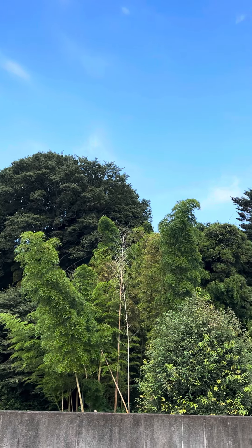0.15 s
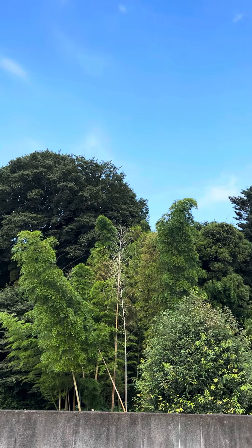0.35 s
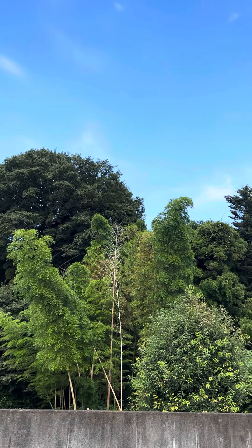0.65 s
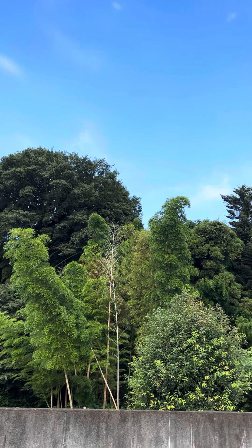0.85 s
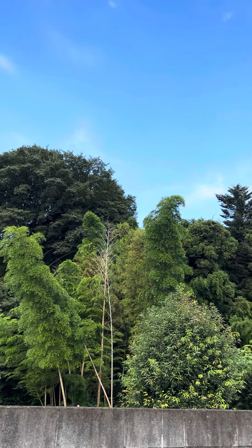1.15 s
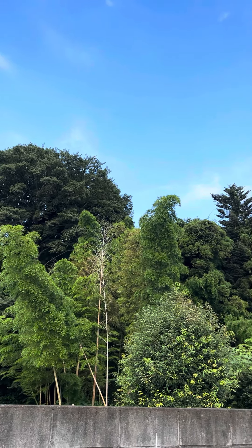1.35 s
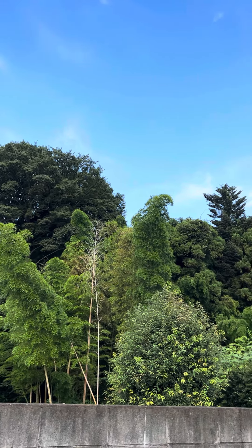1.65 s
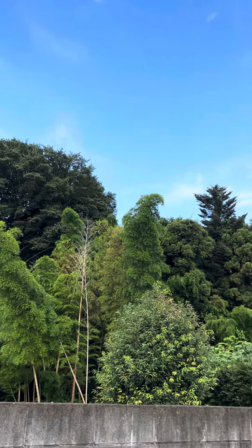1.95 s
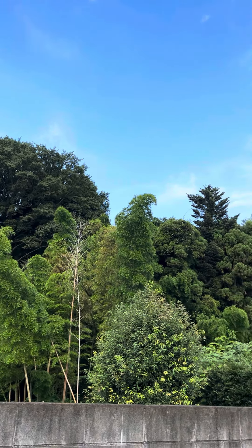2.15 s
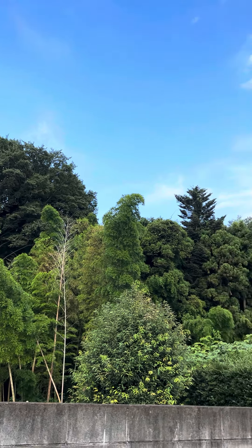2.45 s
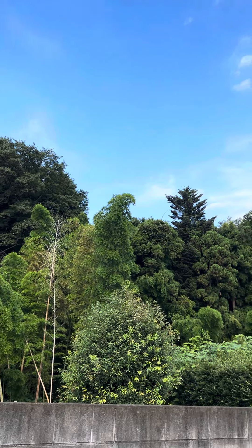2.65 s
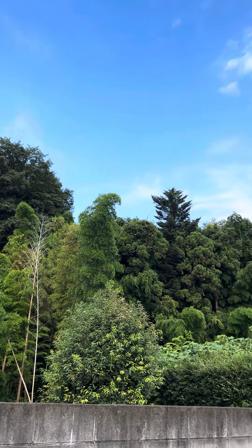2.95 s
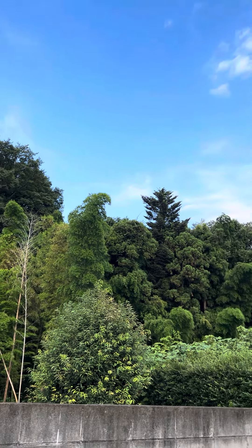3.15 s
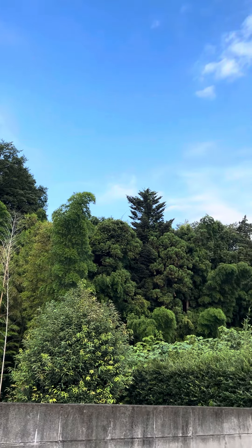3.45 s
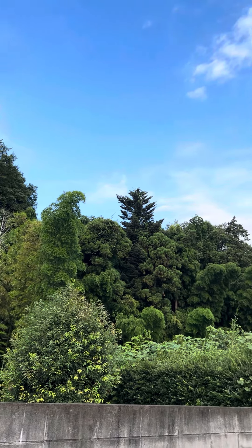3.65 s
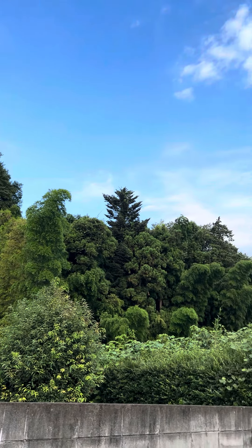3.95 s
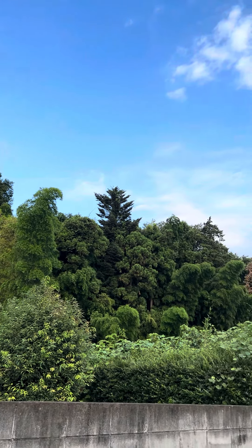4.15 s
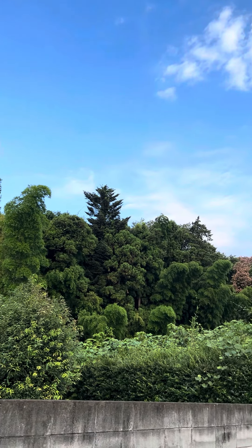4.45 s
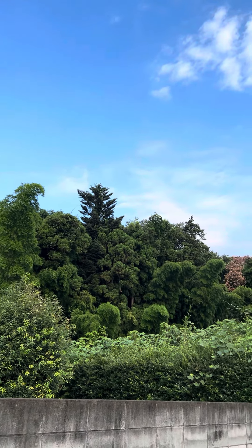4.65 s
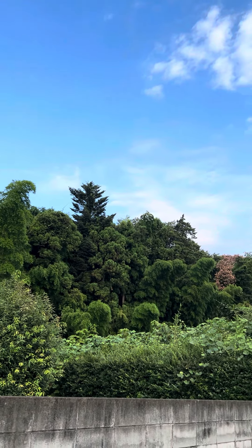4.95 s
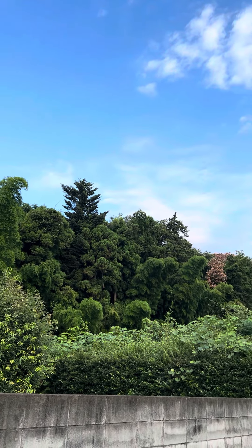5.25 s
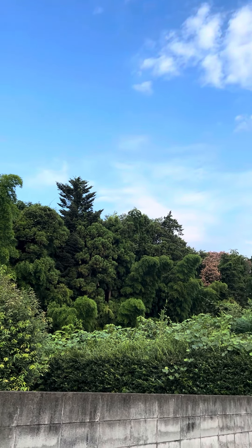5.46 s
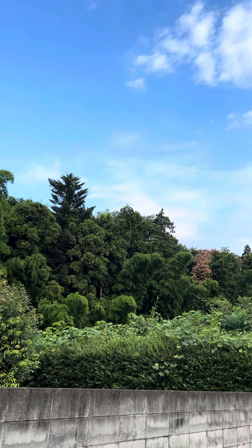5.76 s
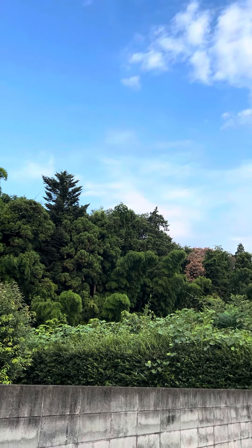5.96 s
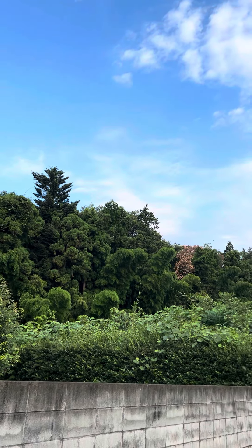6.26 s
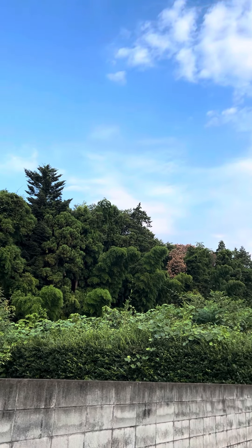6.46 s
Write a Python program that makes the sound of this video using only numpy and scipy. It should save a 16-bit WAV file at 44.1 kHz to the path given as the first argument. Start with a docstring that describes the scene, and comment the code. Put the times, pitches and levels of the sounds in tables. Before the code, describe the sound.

A steady high cicada sizzle fills a summer wood, then a bush warbler swells one long whistle into a quick bright flourish that echoes.

```python
"""Bush warbler at the edge of a summer wood

A bush warbler sings once: three soft notes, a long swelling whistle, then a quick flourish, all of them
nearly pure tones with a gliding pitch. Delayed copies make echoes off a wall, and decaying noise spreads
the song among the trees. Shaped noise makes a cicada chorus, and pulsing resonances or combs of tones make
the cicadas that stand out of it, over a low far rumble. Two close microphones pick it all up.
"""
import sys
import numpy as np
from scipy import signal
from scipy.fft import rfft, irfft, next_fast_len
from scipy.io import wavfile
from scipy.ndimage import uniform_filter1d

SR = 44100
rng = np.random.default_rng(int(sys.argv[2]) if len(sys.argv) > 2 else 0)


def unload_wav(signal):
    """Save mono or channel-first audio to the path in sys.argv[1] as 16-bit WAV at rate SR, clipped to [-1, 1]."""
    wavfile.write(
        sys.argv[1],
        SR,
        np.round(np.clip(np.atleast_2d(signal).T, -1, 1) * 32767).astype(np.int16),
    )


N = 291060
T = np.arange(N) / SR  # time of every sample in seconds
HZ = np.maximum(np.fft.rfftfreq(N, 1 / SR), 1)  # frequency of every spectrum bin
SIDES = np.array([[1], [-1]])  # left and right microphone


# The short notes: three soft ones lead in, the rest are the flourish.
# Each row: start in seconds, time to the turn in seconds, length in seconds, first pitch in Hz,
# turning pitch in Hz, last pitch in Hz, level at the turn in dB.
SHORT_NOTES = [ (3.727, .055, .135, 1520, 1352, 1357, -66.5), (3.956, .075, .15, 1523, 1375, 1345, -70),
               (4.10, .06, .15, 1385, 1340, 1394, -68.5), (5, 0.032, 0.075, 1220, 1461, 1438, -42.5),
               (5.127, 0.0238, 0.043, 1470, 1862, 1560, -37), (5.23, 0.0193, 0.032, 4010, 2732, 2985, -30),
               (5.261, 0.021, .056, 3200, 1922, 2370, -33.5), (5.392, .009, 0.011, 3330, 4980, 4930, -44.5),
               (5.402, 0.012, 0.026, 4950, 3530, 3640, -32), (5.428, .025, 0.046, 4300, 2424, 2513, -28.5),
               (5.526, 0.0291, .066, 1723, 2311, 1210, -32.5)]


def warbler():
    """The song arrives directly, by a few distinct echoes and through the wood."""
    sung = whistle() + sum(note(*row) for row in SHORT_NOTES)
    song, direct = sung[0], sung[1:]
    scattered = wood(song, build_s=0.011, near_db=14, near_t60_s=0.13)
    return direct + catch() + echoes(song) + scattered


WHISTLE_START_S, WHISTLE_CREST_S, WHISTLE_END_S = 4.205, 4.78, 5.012
WHISTLE_FIRST_DB, SWELL_DB_PER_S, SLACKEN_DB_PER_S = -67.5, 21, 28
WHISTLE_HZ, SAG_HZ_PER_DB = 1306, 1.35  # the pitch sags as the bird pushes harder
SCOOP_HZ, SCOOP_S = 60, 0.027  # how far above its pitch it begins, and how quickly it drops
# Surges of effort on top of the swell.
# Each row: time of the peak in seconds, half width in seconds, gain in dB.
EFFORT_SURGES = [(4.67, .05, 7), (4.868, .05, 13)]


def whistle():
    """One held tone drops onto its pitch, swells, surges twice and slackens just before the flourish."""
    t = T[(T > WHISTLE_START_S) & (T < WHISTLE_END_S)]
    swell_db = SWELL_DB_PER_S * (np.minimum(t, WHISTLE_CREST_S) - t[0])
    slacken_db = SLACKEN_DB_PER_S * np.maximum(t - WHISTLE_CREST_S, 0)
    surge_db = sum(db * np.exp(-((t - peak) / width_s) ** 2) for peak, width_s, db in EFFORT_SURGES)
    effort_db = swell_db - slacken_db + surge_db
    scoop_hz = SCOOP_HZ * np.exp(-(t - t[0]) / SCOOP_S)
    hz = WHISTLE_HZ + scoop_hz - SAG_HZ_PER_DB * effort_db
    return syrinx(t, hz, WHISTLE_FIRST_DB + effort_db, attack_s=.02)


DROP_POWER = 2.4  # a note that drops onto its turn starts steeply and flattens out; others run straight
DIM_DB_PER_OCTAVE = 16.5  # loss of level with distance from the turning pitch
ATTACK_SHARE = 0.17  # attack as a share of the note's length


def note(start, turn_s, length_s, first_hz, turning_hz, last_hz, level_db):
    """A glide to the turning pitch and away from it, dimmer the further it is from the turn."""
    t = T[(T > start) & (T < start + length_s)]
    power = DROP_POWER if first_hz > turning_hz else 1
    before = np.clip(1 - (t - start) / turn_s, 0, 1) ** power
    after = np.clip((t - start - turn_s) / max(length_s - turn_s, 1 / SR), 0, 1)
    hz = turning_hz + (first_hz - turning_hz) * before + (last_hz - turning_hz) * after
    octaves_off = np.abs(np.log2(hz / turning_hz))
    return syrinx(t, hz, level_db - DIM_DB_PER_OCTAVE * octaves_off, ATTACK_SHARE * length_s)


RELEASE_S, OVERTONE_DB = 0.0035, -36
WAVER = 0.0022  # pitch unsteadiness as a share of the pitch
# How the direct song falls on the two microphones.
# Each row: frequency in Hz, left level over right in dB, radians by which left leads.
DIRECT_PAN = [(1280, -1, -.58), (1450, 0, -.15), (1750, 0, .25), (1950, 1.5, .7), (2250, 2, 1),
              (2450, -1.2, 1.05), (2800, -9, 1.35), (3550, -6, 1.3), (5000, 0, 1.2)]


def syrinx(t, hz, level_db, attack_s):
    """The bird's voice organ: a nearly pure tone. Rows: as sung (with a trace of octave), left, right."""
    hz = uniform_filter1d(hz, size=170) * (1 + WAVER * drift(55)[:len(t)])
    edges = np.clip(np.minimum((t - t[0]) / attack_s, (t[-1] - t) / RELEASE_S), 0, 1)
    height = np.sqrt(2) * from_db(level_db) * edges
    phase = turn(hz)
    tone = np.sin(phase) + from_db(OVERTONE_DB) * np.sin(2 * phase)
    pan_db, lead = at_hz(DIRECT_PAN, hz)
    pan = from_db(SIDES * pan_db / 2)
    pan = pan / np.sqrt(np.mean(pan ** 2, axis=0))  # panning keeps the total power
    heard = np.sin(phase + SIDES * lead / 2) * pan
    first = np.searchsorted(T, t[0])
    return np.pad(height * np.vstack([tone, heard]), [(0, 0), (first, N - first - len(t))])


CATCH_START_S, CATCH_END_S, CATCH_FADE_S, CATCH_DB = 4.972, 5.003, 0.03, -67.5


def catch():
    """A short rasp as the whistle breaks into the flourish: a burst of narrow noise."""
    burst = bout(CATCH_START_S, CATCH_END_S, CATCH_FADE_S)
    return from_db(CATCH_DB) * burst * resonance(1900, width_hz=340)


# Echoes from wall and thicket.
# Each row: delay in seconds, left level in dB, right level in dB, both relative to the filtered song.
WALL_ECHOES = [(.0145, -15.5, -17.5), (.024, -10, -15.5), (.037, -14.5, -9.5)]


def echoes(song):
    """Late copies of the song, which carry mainly the middle of its range."""
    low_cut, high_cut = 1 + (1300 / HZ) ** 20, 1 + (HZ / 4700) ** 10
    thrown_back = irfft(rfft(song) / low_cut / high_cut, N)
    return sum(from_db([[left_db], [right_db]]) * np.interp(T - delay, T, thrown_back)
               for delay, left_db, right_db in WALL_ECHOES)


WOOD_T60_S, WOOD_DB = 0.98, -1  # time for the long wash to fall by 60 dB, and gain of the whole wash
# Colour of the wood's reverberation, before the gain of the whole wash.
# Each row: frequency in Hz, level in dB.
WOOD_COLOUR = [(1280, -14.5), (1450, -9.5), (1750, -5.5), (2300, -2), (3000, -3.5), (3700, -4.5),
               (5000, -6)]


def wood(song, build_s, near_db, near_t60_s):
    """Trunks and leaves scatter the song: a quick wash from the thicket, a long one from trees behind."""
    decay = from_db(-60 * T / WOOD_T60_S) + from_db(near_db - 60 * T / near_t60_s)
    build = 1 - np.exp(-(T / build_s) ** 2)
    responses = rng.standard_normal((2, N)) * decay * build
    colour = from_db(at_hz(WOOD_COLOUR, HZ)[0])
    spectra = rfft(responses) / np.linalg.norm(responses[0]) * colour
    shared, scattered = irfft(rfft(song) * spectra, N)
    return from_db(WOOD_DB) * at_microphones(shared, scattered)


def insects():
    """The massed chorus with single cicadas standing out of it."""
    chant = chanting_cicada(jitter=.003, uneven_db=-4, flutter_db=3, tilt_db=2.8)
    return chorus() + single_cicadas() + whining_cicada() + rasping_cicada() + chant


# The cicada chorus before its swell. Each row: frequency in Hz, level in dB per Hz.
CHORUS_SPECTRUM = [(3100, -126), (4000, -115), (5000, -99), (5500, -89), (6300, -84), (7000, -76.5),
                   (7500, -74.5), (8000, -73.5), (8600, -78.5), (9200, -81.5), (10000, -99.5),
                   (11000, -104), (13500, -103), (15000, -109)]
# The chorus's swell. Each row: time in seconds, gain in dB.
CHORUS_SWELL = [(0, 0.5), (3, -0.5), (5, 0.9), (6.1, 0.5), (6.35, 2), (6.6, 2.5)]


def chorus():
    """Many cicadas blend into a sizzle: shaped noise that swells slowly and wavers a little."""
    return noise(CHORUS_SPECTRUM) * from_db(in_time(CHORUS_SWELL) + .25 * drift(12))


SINGER_FADE_S = 0.53
# Single cicadas, each holding its pitch for one bout.
# Each row: start in seconds, end in seconds, body resonance in Hz, level before the pumping in dB.
SINGER_BOUTS = [(-.3, 1.2, 5080, -72), (.4, 3.4, 7845, -55), (.7, 3.5, 8015, -52), (1.5, 6.0, 7444, -55),
                (2.5, 3.7, 5530, -67), (3.5, 4.3, 7865, -48), (4.3, 6.0, 5080, -68), (4.9, 6.3, 7860, -53),
                (5.4, 6.3, 5420, -68), (6.1, 6.9, 8100, -49)]


def single_cicadas():
    """Near singers come and go, each on its own pitch."""
    total = 0
    for start, end, hz, db in SINGER_BOUTS:
        voice = cicada(hz, width_hz=16, tymbal_hz=494.6, depth=.75)
        total = total + from_db(db) * bout(start, end, SINGER_FADE_S) * voice
    return total


WHINE_START_S, WHINE_RISE_S, WHINE_END_S, WHINE_FADE_S = 2.4, 1.8, 5.9, 0.082
WHINE_DB = -46.5  # at full effort, before the pumping
WHINE_FIRST_HZ, WHINE_HELD_HZ = 6800, 6390


def whining_cicada():
    """Growing effort raises the level and lowers the resonance; the whine holds, then breaks off."""
    effort = np.clip((T - WHINE_START_S) / WHINE_RISE_S, 0, 1)
    hz = WHINE_FIRST_HZ + (WHINE_HELD_HZ - WHINE_FIRST_HZ) * effort
    voice = cicada(hz, width_hz=58, tymbal_hz=410, depth=0.59)
    return from_db(WHINE_DB) * effort * bout(WHINE_START_S, WHINE_END_S, WHINE_FADE_S) * voice


def cicada(hz, width_hz, tymbal_hz, depth):
    """The tymbals click some hundred times a second and pump a sharp resonance of the body."""
    pumping = 1 + depth * np.cos(turn(tymbal_hz * (1 + .001 * drift(2))))
    return resonance(hz, width_hz) * pumping


RASP_FADE_S = .12
# Bouts of a far cicada's dry rasp. Each row: start in seconds, end in seconds, level in dB.
RASP_BOUTS = [(3.17, 4.45, -74.5), (4.45, 6.3, -84.5), (6.29, 6.8, -77.5)]


def rasping_cicada():
    """A far cicada's dry rasp: bouts of a broad, randomly driven resonance."""
    level = sum(from_db(db) * bout(start, end, RASP_FADE_S) for start, end, db in RASP_BOUTS)
    return level * resonance(4000, width_hz=380)


CHANT_DB, CHANT_FADE_S = -77.5, .07
# Pulses of a far cicada's chant. Each row: start in seconds, end in seconds.
CHANT_PULSES = [(.1, 0.75), (1.1, 1.3), (1.62, 1.88), (2.1, 2.37), (2.64, 3.08), (5.68, 8.5)]
# The pace of its tymbal pair, before the jitter. Each row: time in seconds, cycles per second.
TYMBAL_PACE = [(0, 188), (.6, 198.5), (1.5, 199.5), (3, 192), (5.5, 196), (6.1, 211)]


def chanting_cicada(jitter, uneven_db, flutter_db, tilt_db):
    """Two tymbals click in turn: a comb of lines with every second one weaker, blurred by distance."""
    phase = turn(in_time(TYMBAL_PACE) * (1 + jitter * drift(40)))
    pulses = sum(bout(start, end, CHANT_FADE_S) for start, end in CHANT_PULSES)
    lines = 0
    for order in range(18, 26):  # multiples of the pace
        line_db = tilt_db * min(order - 22, 0) + uneven_db * (order % 2)
        lines = lines + from_db(line_db + flutter_db * drift(12)) * np.sin(order * phase)
    return from_db(CHANT_DB) * pulses * lines


# Far rumble and air, before the slight wavering. Each row: frequency in Hz, level in dB per Hz.
RUMBLE_SPECTRUM = [(15, -105), (25, -88), (48, -74.5), (80, -80), (120, -85), (200, -89), (400, -94),
                   (800, -99.5), (1200, -102), (1700, -108.5), (2400, -117), (3100, -125), (6000, -132)]


def rumble():
    """Far rumble and air: mostly low noise whose level wavers slightly."""
    return noise(RUMBLE_SPECTRUM) * from_db(0.18 * drift(27))


def surroundings():
    """Insects over the far rumble."""
    return insects() + rumble()


# The surroundings and the wood's wash at the microphone pair.
# Each row: frequency in Hz, left-right likeness from 0 to 1, radians by which right leads.
MICROPHONE_PAIR = [(50, 1, 0), (160, .94, .15), (400, .66, .65), (750, .55, 1.25), (1150, .75, .7),
                   (1300, .94, .45), (1450, .98, 0), (2000, .95, 0), (2400, .45, -.8), (3000, .35, -2.7),
                   (4000, .25, -4.7), (5000, .4, -2.2), (5800, .92, -3.0), (6250, .95, -3.4),
                   (7550, .97, -5.7), (7650, .99, -2 * np.pi), (8200, .99, -6.33), (8900, .93, -6.7),
                   (9050, .94, -7.6), (9600, .95, -8.5), (9750, .98, -3 * np.pi), (11000, .9, -3 * np.pi),
                   (11750, .95, -4 * np.pi), (13200, .95, -4 * np.pi), (14300, .9, -5 * np.pi)]


def at_microphones(shared, scattered):
    """The pair hears one sound with a phase difference, plus a scattered one with opposite signs."""
    alike, lead = at_hz(MICROPHONE_PAIR, HZ)
    common = np.sqrt((1 + alike) / 2) * rfft(shared)
    opposed = SIDES * np.sqrt((1 - alike) / 2) * rfft(scattered)
    return irfft((common + opposed) * np.exp(-.5j * SIDES * lead), N)


def bout(start, end, fade_s):
    """Fade in around the start, hold, fade out around the end."""
    return np.clip(.5 + np.minimum(T - start, end - T) / fade_s, 0, 1)


def resonance(hz, width_hz):
    """A randomly driven resonance whose centre may move; rms 1."""
    phase = turn(hz * np.ones(N))
    return drift(width_hz) * np.cos(phase) + drift(width_hz) * np.sin(phase)


def noise(spectrum):
    """Steady noise with the given dB per Hz."""
    white = rfft(rng.standard_normal(N))
    return irfft(white * from_db(at_hz(spectrum, HZ)[0]), N) * np.sqrt(SR / 2)


def drift(rate_hz):
    """Slow random wandering of spread 1: noise with everything above the rate weakened."""
    size = next_fast_len(N)
    weakening = 1 + (np.fft.rfftfreq(size, 1 / SR) / rate_hz) ** 2
    slow = irfft(rfft(rng.standard_normal(size)) / weakening, size)[:N]
    return slow / slow.std()


def turn(hz):
    """Running phase of a frequency curve."""
    return 2 * np.pi * np.cumsum(hz) / SR


def from_db(db):
    """Decibels to gain."""
    return 10 ** (np.asarray(db) / 20)


def in_time(rows):
    """A curve of (seconds, value) rows at every sample."""
    seconds, values = np.transpose(rows)
    return np.interp(T, seconds, values)


def at_hz(points, hz):
    """Each column of a spectrum at the given frequencies, joined along a logarithmic scale."""
    knots, *columns = np.transpose(points)
    return [np.interp(np.log(hz), np.log(knots), column) for column in columns]


def scene():
    """The bird sings amid the sound of the wood."""
    return warbler() + at_microphones(surroundings(), surroundings())


CUTOFF_HZ = 14600


def record(dry):
    """The top of the treble is cut steeply."""
    return signal.sosfilt(signal.butter(24, CUTOFF_HZ, fs=SR, output="sos"), dry)


dry = scene()
out = record(dry)
unload_wav(out)
```